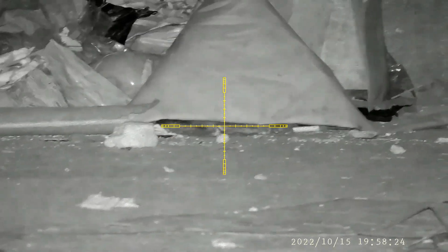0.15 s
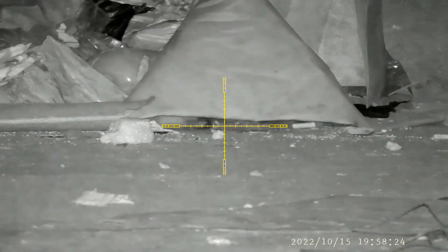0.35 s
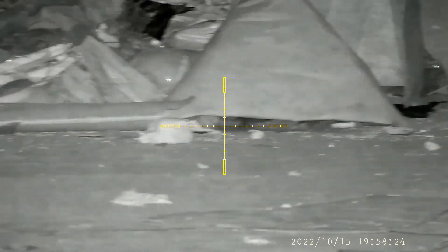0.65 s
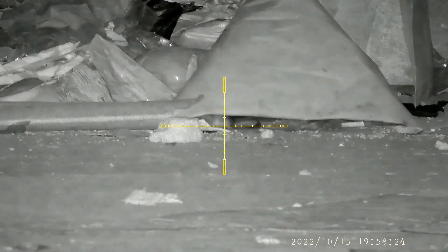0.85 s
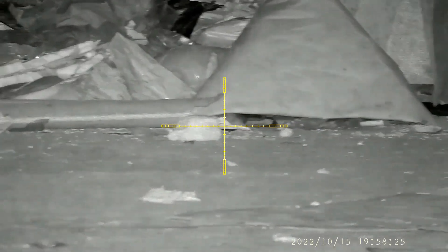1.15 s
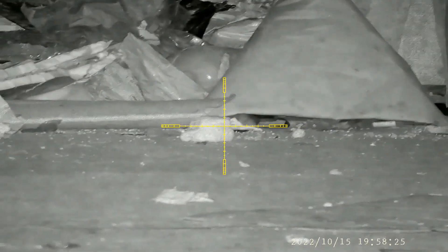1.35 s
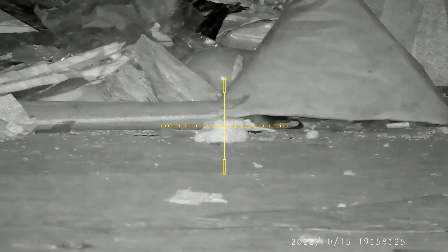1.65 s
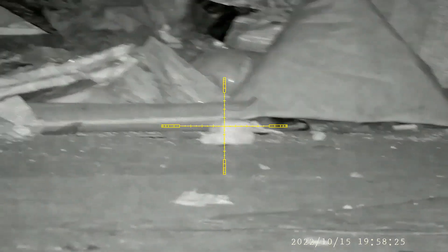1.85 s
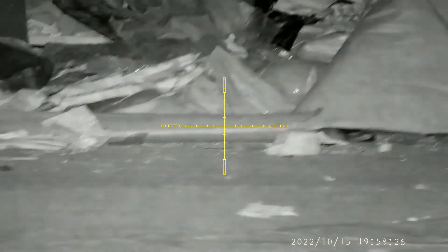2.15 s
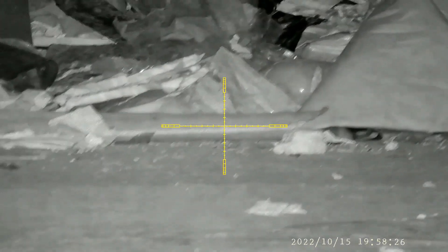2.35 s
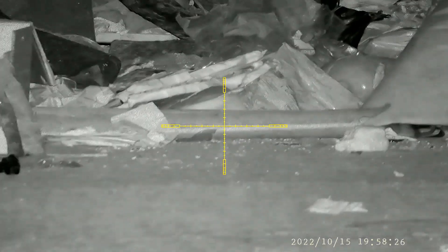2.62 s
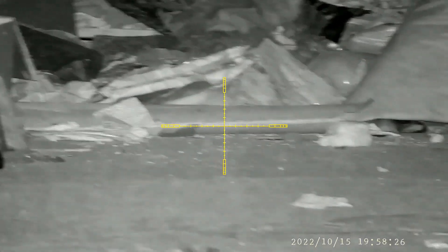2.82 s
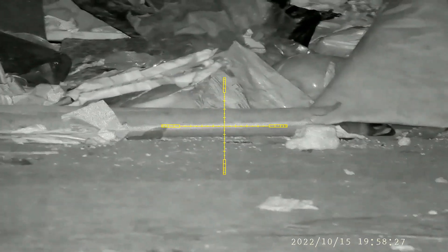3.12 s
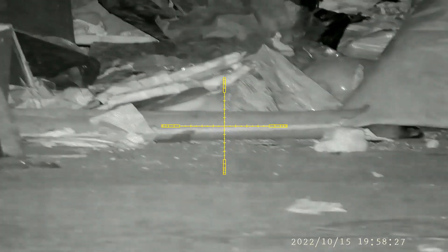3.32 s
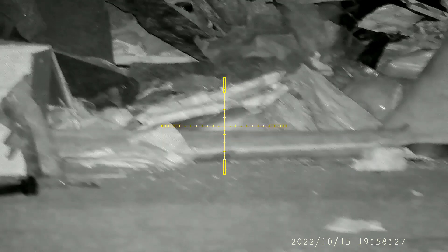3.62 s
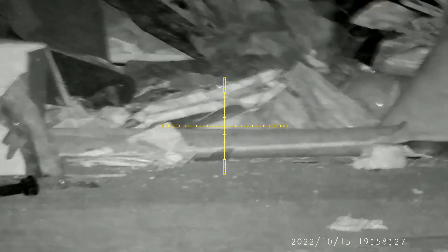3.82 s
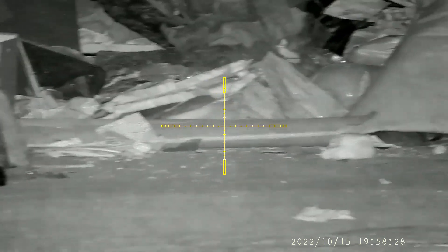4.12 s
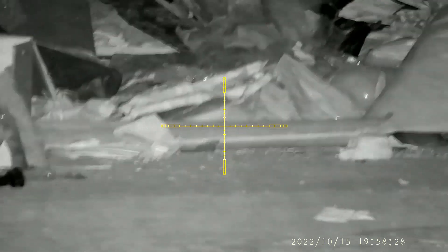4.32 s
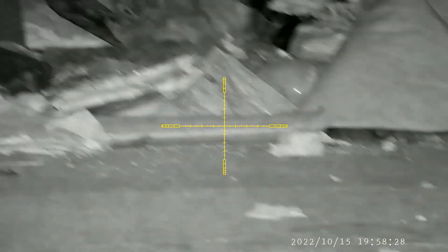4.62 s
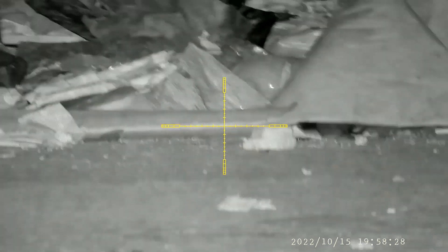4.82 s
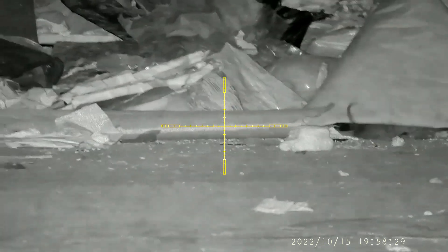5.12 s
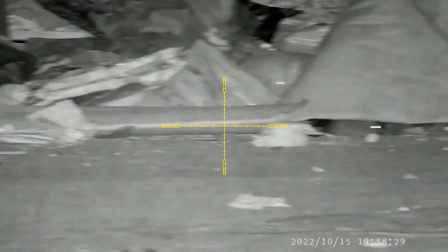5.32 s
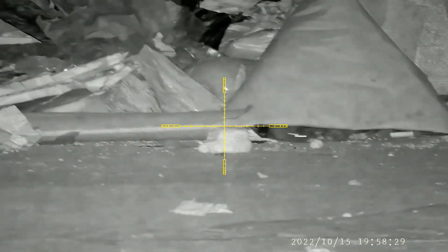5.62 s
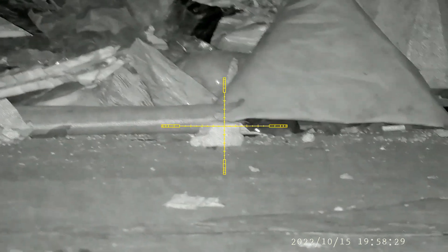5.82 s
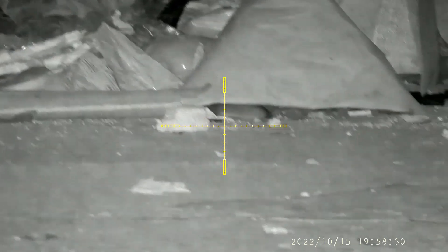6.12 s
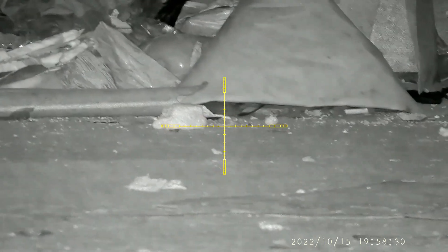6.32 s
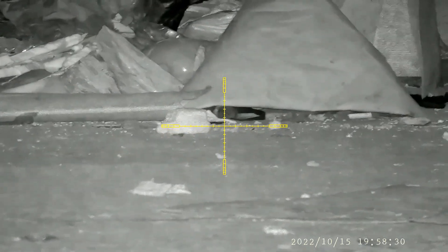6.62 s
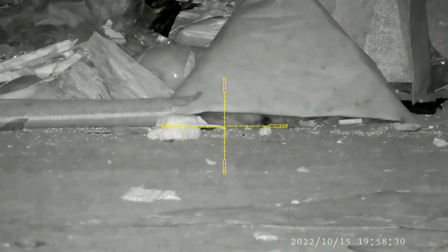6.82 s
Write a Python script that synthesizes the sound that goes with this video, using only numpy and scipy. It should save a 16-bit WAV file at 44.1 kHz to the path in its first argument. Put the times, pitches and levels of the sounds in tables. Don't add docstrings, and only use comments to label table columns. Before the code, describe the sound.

A microphone fixed to the rifle catches the shot as a clipped, dry crack, air burst and thump, followed by a fading steel ring and steady thin hiss. Small ticks lead to a dense run of cocking clanks and scrapes, then lighter knocks and a strong bolt-closing clack. Stock bumps thud the microphone. A distant cricket chirps sparsely; the last two seconds are mostly hiss.

```python
import sys
import numpy as np
from scipy import signal
from scipy.fft import rfft, irfft, next_fast_len
from scipy.io import wavfile
from scipy.ndimage import uniform_filter1d

SR = 44100
rng = np.random.default_rng(int(sys.argv[2]) if len(sys.argv) > 2 else 0)


def log_audio(samples):
    frames = np.atleast_2d(samples).T
    limited = np.clip(frames, -1, 1)
    pcm = np.round(limited * 32767).astype(np.int16)
    wavfile.write(sys.argv[1], SR, pcm)


def to_linear_factor(level_db):
    exponent = np.asarray(level_db, float) / 20
    return 10 ** exponent


N = 306803


def filtered(x, response):
    size = next_fast_len(N + SR // 2)
    spectrum = rfft(x, size) * response(np.fft.rfftfreq(size, 1 / SR))
    return irfft(spectrum, size)[..., :N]


def modes(hz, peaks):
    total = 0
    for k, (centre_hz, width_hz, level_db) in enumerate(peaks):
        damping = 1j * hz * width_hz
        total = total + (-1) ** k * to_linear_factor(level_db) * damping / (centre_hz ** 2 - hz * hz + damping)
    return total


def noise(response):
    x = filtered(rng.standard_normal(N), response)
    return x / np.std(x)


def add(track, start_s, sound):
    i = max(round(start_s * SR), 0)
    track[..., i:i + sound.shape[-1]] += sound[..., :N - i]


# pitch_hz, level_db
HISS = [(15, -27), (25, 2.5), (378, 0.5), (2770, -14.5), (6500, -20), (11200, -20.5), (15400, -28),
        (15900, -69.5)]
# pitch_hz, width_hz, level_db
SUPPLY = [(9500, 200, -70), (10440, 140, -72), (7100, 280, -78.5), (12600, 400, -85)]
# pitch_hz, level_db
WHINE = [(1265, -83), (9362, -81), (10363, -80.5)]
CLOCK_DB = [-80.5, -80, -77, -75, -78, -78, -73, -85, -80.5, -69.5, -93, -86.5, -84.5]


def electronics():
    pitch_hz, level_db = np.transpose(HISS)
    out = to_linear_factor(-61) * noise(lambda hz: to_linear_factor(np.interp(np.log(hz + 1), np.log(pitch_hz), level_db)))
    for centre_hz, width_hz, db in SUPPLY:
        out += to_linear_factor(db) * noise(lambda hz: np.exp(-((hz - centre_hz) / width_hz) ** 2))
    clock_hz = 1001
    tones = WHINE + [(clock_hz * (k + 1), db) for k, db in enumerate(CLOCK_DB)]
    for tone_hz, db in tones:
        wander = 0.0028 * np.cumsum(rng.standard_normal(N))
        out += to_linear_factor(db + 2.5) * np.sin(2 * np.pi * tone_hz * np.arange(N) / SR + wander)
    return out


# start_s, level_db, pulses
CHIRPS = [(2.531, -58, 2), (3.699, -58, 4), (4.862, -58, 4), (5.363, -60, 1), (6.069, -59, 4),
          (6.571, -59, 1)]


def cricket():
    out, t = np.zeros(N), np.arange(round(0.019 * SR)) / SR
    pulse = np.sin(np.pi * t / t[-1]) ** 0.23 * np.sin(2 * np.pi * 4066 * t)
    for start_s, level_db, pulses in CHIRPS:
        for k in range(round(pulses)):
            add(out, start_s + 0.022 * k, to_linear_factor(level_db + rng.normal(0, 1.0)) * pulse)
    return out


# top_s, top_db, swing_s, rebound_share
COCKING_JOLTS = [(.009, -15.5, 0.012, .47), (1.9198, -33, 0.00073, .9), (1.925, -23, .0033, 0.25),
                 (2.201, -25.5, .0095, 1.3), (2.221, -22, 0.0048, .78), (2.258, -21, .023, 0.43),
                 (2.276, -22.5, .019, .97), (2.303, -24.5, 0.0032, 1.05), (2.368, -25.5, 0.0041, 1.05),
                 (2.377, -16.5, .0098, .45), (2.391, -26, 0.0068, 1.1), (2.416, -17.5, .01, .2),
                 (2.573, -24, 0.035, 1.1), (2.684, -34, 0.0032, 0.4)]
CLOSING_JOLTS = [(3.236, -29, 0.019, 0.52), (3.25, -20.5, 0.019, 0.44), (3.263, -24.5, 0.01, 0.88),
                 (3.373, -33.5, 0.016, 0.56), (3.71, -32, 0.022, 0.67), (3.909, -15, 0.0032, 0.24),
                 (3.92, -22.5, 0.011, 0.67), (3.938, -31, 0.0063, 0.56), (4.051, -36, 0.022, 0.6),
                 (4.376, -20.5, 0.0031, 1.1), (4.384, -23, 0.0067, 1.6), (4.414, -28, 0.0091, 1.2),
                 (4.425, -20, 0.0051, 1.2), (4.447, -32, 0.0041, 0.8), (4.5213, -20.5, 0.042, 0.23),
                 (4.616, -27, 0.027, 0.49), (4.68, -32.5, 0.056, 1.43), (4.89, -24.5, 0.026, 0.86)]
SWAYS = [(0.022, -20, 0.003, 1.3), (0.042, -22, .0048, 0.58), (0.074, -25.5, 0.039, 0.43),
         (0.098, -31, 0.02, 0.42), (.12, -36, 0.022, 1.2), (0.148, -32, 0.017, 0.47),
         (.173, -26.5, 0.02, 0.26), (0.195, -32, 0.0087, 0.12), (4.393, -11.5, 0.0087, 0.29),
         (4.437, -29, 0.0037, .14), (4.454, -24.5, 0.0041, 0.49), (4.487, -17, 0.046, 0.5),
         (4.54, -32.5, 0.022, 0.72), (4.593, -28.5, 0.032, 1.4)]


def lurches():
    out = np.zeros(N)
    jolt_fall_s, sway_fall_s = 0.0021, 0.013
    rows = [(*row, jolt_fall_s) for row in COCKING_JOLTS + CLOSING_JOLTS]
    rows += [(*row, sway_fall_s) for row in SWAYS]
    for top_s, top_db, swing_s, rebound, fall_s in rows:
        swing, fall = max(swing_s, .001) * SR, max(fall_s, .001) * SR
        u, v = np.arange(swing) / swing, np.arange(fall) / fall
        rise = -u ** .8 * np.sin(1.5 * np.pi * u)
        drop = 1 - (1 + rebound) * (1 - np.cos(np.pi * v)) / 2
        settle_s = 0.0055 + 0.67 * fall_s
        settle = -rebound * np.exp(-(np.arange(SR // 10) / SR / settle_s) ** 1.5)
        add(out, top_s - len(u) / SR, to_linear_factor(top_db) * np.concatenate([rise, drop, settle]))

    def capsule(hz):
        mount = 1 + modes(hz, [(129, 12, -14.0), (269.8, 22, -9.0)])
        return mount / (1 + 1j * hz / 900) * hz / (hz - 6j)

    return filtered(out, capsule)


# pitch_hz, width_hz, level_db
HOUSING = [(1445, 93, -1), (1978, 110, 4.5), (2680, 38, -13), (3030, 140, -3.5), (3544, 150, -9),
           (4160, 170, -3), (5180, 120, -14.5), (5330, 110, -21.5), (6294, 200, -3.5), (8396, 200, -21.5),
           (9500, 540, -46.5), (11300, 90, -38), (11725, 250, -36.5), (13200, 260, -31.5)]
# low_hz, high_hz
EDGES = [(300, 650), (800, 1250), (1250, 1700), (1700, 2350), (2350, 3250), (3250, 3800), (3800, 5000),
         (5000, 5800), (5800, 6900), (6900, 8500), (9000, 11500), (11500, 13400)]


def housing():
    hz = np.fft.rfftfreq(SR // 2, 1 / SR)
    broad = [(417, 130, -17.5), (1103, 320, -7.5), (2430, 940, -10.0), (6500, 3300, -16.5), (10500, 1800, -41)]
    whole = irfft(modes(hz, HOUSING) + modes(hz, broad))[:SR // 25]
    groups = []
    for band in EDGES:
        sos = signal.butter(2, band, "band", fs=SR, output="sos")
        groups.append(signal.sosfilt(sos, whole))
    return np.array(groups) / np.linalg.norm(groups, axis=1)[:, None]


# start_s, end_s, first_db, last_db, brightness_db
SLIDES = [(1.927, 1.978, -52, -65, 1.5), (2.173, 2.216, -47.5, -48.5, -5.5),
          (2.228, 2.31, -54, -37.5, -6.5), (2.292, 2.338, -40.5, -36, -4.5), (2.342, 2.422, -40, -37, -3),
          (2.405, 2.506, -47, -63, -0.5), (2.472, 2.538, -64, -55, -1), (2.584, 2.734, -48.5, -58.5, -5),
          (3.194, 3.34, -54.5, -53, 2), (3.683, 3.81, -56, -63.5, -2), (3.92, 3.978, -50, -59.5, -1),
          (3.982, 4.246, -58, -66.5, -6), (4.373, 4.447, -44, -50.5, -3.5), (4.446, 4.562, -54, -51.5, 0.5),
          (4.552, 4.66, -54.5, -54.5, -2), (4.66, 4.755, -55, -62, -2.5), (4.884, 4.936, -58, -56.5, -2.5),
          (4.924, 4.973, -57, -50.5, -10), (4.972, 5.059, -64, -70, -4.5)]


def scrape():
    t, level = np.arange(N) / SR, np.zeros((2, N))
    for start_s, end_s, first_db, last_db, bright_db in SLIDES:
        ramp_db = np.interp(t, [start_s, end_s], [first_db, last_db], left=-120, right=-120)
        level += to_linear_factor(ramp_db + [[0], [bright_db]])
    level = uniform_filter1d(level, size=500)

    def lumps(size, rows):
        return rng.standard_normal((rows, N // size + 1)).repeat(size, axis=1)[:, :N]

    clumping_db = 1.7 * lumps(60, 1) + 3.1 * lumps(400, len(EDGES))
    grains = rng.standard_normal((len(EDGES), N)) * to_linear_factor(clumping_db)
    colour_db = np.array([-8.5, -8.0, -8, -5.5, -12, -10.5, -8.5, -12, -9, -9.5, -11.5, -14.5])[:, None]
    drive = grains / np.std(grains) * level[[0] * 5 + [1] * 7] * to_linear_factor(colour_db)
    return signal.oaconvolve(drive, housing()[:, :SR // 50], axes=1)[:, :N].sum(axis=0)


# pitch_hz, level_db
COIL = [(1400, -9), (2010, 3), (2300, -0.5), (2920, -4), (4080, -8), (4260, -14), (5330, -5), (5560, -11),
        (6050, -1), (7000, -9), (8050, -0.5), (8380, -1)]
# time_s, level_db
COIL_SWELL = [
    (2.525, -78),
    (2.534, -53),
    (2.546, -48),
    (2.549, -35.5),
    (2.556, -46),
    (2.559, -75),
]


def coil():
    time_s, level_db = np.transpose(COIL_SWELL)
    t, out = np.arange(time_s[0], time_s[-1], 1 / SR), np.zeros(N)
    creak = np.zeros(len(t))
    for pitch_hz, db in COIL:
        wander = 0.031 * np.cumsum(rng.standard_normal(len(t)))
        creak += to_linear_factor(db) * np.sin(2 * np.pi * pitch_hz * t + wander)
    add(out, time_s[0], to_linear_factor(np.interp(t, time_s, level_db)) * creak)
    return out


def ringing(bar, level_db, rough):
    t = np.arange(SR * 2 // 3) / SR
    out = np.zeros(len(t))
    for pitch_hz, db, t60_s in bar:
        wander = rough * np.cumsum(rng.standard_normal(len(t)))
        out += to_linear_factor(level_db + db - 60 * t / min(t60_s, .8)) * np.sin(2 * np.pi * pitch_hz * t + wander)
    return out


# pitch_hz, level_db, rise_s, t60_s
TANK = (1841, -27, 0.37, 1.02)
# pitch_hz, level_db, t60_s
BARREL = [(2310, -28, .29), (2697, -20, 0.3), (4592, -28, 0.38), (3564, 7, 0.23), (5125, -7, 0.31),
          (6282, -12, .45), (8479, -25, .5), (9577, -17, 0.43), (1200, -22, 0.55), (440, -21.5, .3),
          (320, -23, .8), (197, -27, 0.7), (10400, -30, .3), (11700, -27, .2)]
CATCH = [(1529, -6, 0.09), (2202, -7, 0.15), (2573, 2, 0.07), (6438, -7, .095), (2950, -8, 0.12),
         (3542, -7, 0.25), (5647, -8, 0.13), (6282, -7, .1), (8662, -11, 0.17), (9335, -7, 0.08),
         (9787, -12, .16), (15300, -25, .1), (13440, -11, .09)]
BREECH = [(1480, -7, 0.16), (1992, -12, .25), (3558, 0, 0.22), (3811, -8, .22), (4194, -8, 0.35),
          (6277, -6, 0.27), (6977, -13, .13), (9770, -14.5, 0.081)]
LEVER = [(1437, 5, 0.08), (3558, -3, 0.25), (4544, -9, 0.11), (5216, 1, 0.14), (5642, -13.5, 0.13),
         (6282, -24, 0.3), (1900, -20, 0.4), (9006, -20.5, 0.25)]


def steel():
    out, t = np.zeros(N), np.arange(2 * SR) / SR
    pitch_hz, level_db, rise_s, t60_s = TANK
    swell = to_linear_factor(level_db - 60 * t / t60_s) * (1 - np.exp(-(t / rise_s) ** 2))
    add(out, 0, swell * np.sin(2 * np.pi * pitch_hz * t))
    add(out, 0, ringing(BARREL, -24.0, rough=.003))
    add(out, 2.215, ringing(CATCH, -36.0, rough=.006))
    add(out, 2.372, ringing(BREECH, -39.5, rough=.005))
    add(out, 2.412, ringing(LEVER, -32.5, rough=0.0066))
    add(out, 4.385, ringing(BREECH, -38.5, rough=0.0058))
    return out


# time_s, level_db
AIR = [
    (0, -24.5),
    (.042, -28.5),
    (0.065, -38.5),
    (0.073, -44),
    (0.083, -62),
    (.12, -76.5),
]


def air():
    level = to_linear_factor(np.interp(np.arange(N) / SR, *np.transpose(AIR), right=-120))
    peaks = [(2200, 6000, -3.5), (5923, 4100, -1.0), (10800, 4900, -2.5)]
    return level * noise(lambda hz: modes(hz, peaks) * (hz > 900))


# (0 gives the ten lower groups the
# common EVEN_DB colour, 1 the part's own colour; the two treble groups always take the part's treble_db)
HAMMER = [(0, 5, 1.5, 0.66), (.002, 0.5, 1.56, 1.3), (.006, -1, 1.5, 0.73), (.008, -9, 4, 2.7),
          (.0143, 1, .8, 0.63), (.016, -3.5, 1.4, 1.7), (.0198, -12, 1.5, .6), (.024, -12.5, 5.7, 1.2),
          (.0298, -5, 1.2, 0.9), (.0315, -10, 1.5, 0.85), (.033, -16.5, 2.4, 0.53), (.039, -13, 1.4, 0.68),
          (.042, -26, 9.2, .1)]
BOLT = [(2.179, -11, 1.9, 1.36), (2.189, -18.5, 2.8, 0.31), (2.366, 1.5, 1.46, 0.38),
        (2.369, -2, 3.3, 2.85), (2.373, -4.5, 0.55, 1), (2.381, -20, 10.3, 1.4), (3.24, -15.5, 1.6, 0.68),
        (4.378, -1, 1.52, 1.23), (4.382, -2.5, 2.2, 0.82), (4.432, -37, 2.5, 1.1)]
SEAR = [(.0035, -5, 1.65, 1.2), (2.2043, 1, 1.6, 0.27), (2.298, -26, 2.2, 0.64), (2.357, -9, 3.3, 1.1),
        (2.401, -20, 1.4, 1.3), (2.405, -3, 2.7, 0.32), (3.209, -49.5, 3, 0.33), (4.368, -8.5, 1.27, 0.34),
        (4.375, -4.5, 3.1, 1.23), (4.548, -14, 2.06, 1.04)]
PIVOT = [(2.2075, -7.5, 2.2, 0.69), (2.21, -11, 1.8, 1), (2.314, -16.5, 3.6, 0.63), (2.325, -21, 1.3, 0.36),
         (2.362, -14, 4.25, 0.32), (3.225, -34, 2.7, 0.49), (3.227, -22, 1.8, 0.54),
         (3.2295, -23.5, 1.6, .6), (3.2375, -14, 1.4, 0.36), (3.243, -31, 2.6, 0.32),
         (3.2615, -12, 2, 1.15), (3.898, -22, 1.84, 0.82), (3.9005, -16, 1.5, 1.2), (3.903, -18, 1.7, 0.69)]
STOP = [(2.307, -16.5, 4.2, 0.39), (2.681, -25.5, 2.7, 1), (3.318, -25.5, 0.54, 0.28), (3.908, -16, 2.9, 1),
        (4.386, -23, 2.7, 0.2)]
LOCK = [(2.408, 0.5, 1.7, 1.1), (2.4125, -11.5, 2, 1)]
SAFETY = [(1.749, -31, 0.33, 0.94), (4.426, -34.5, 1.5, 1)]
SLING = [(1.9195, -17.5, 0.72, 1), (1.924, -29, 1.3, 0.68)]
CAP = [(2.2095, -26, 2.6, 1), (2.2125, -22.5, 1.5, 1), (3.266, -35, 2, 1), (3.272, -41, 12, 0.92),
       (4.385, -25.5, 1.17, 1), (4.39, -39, 12, 1), (4.405, -43.5, 12, 1), (4.432, -50, 3, 1)]
RAIL = [(.475, -46, 7.8, 1.3), (.496, -35, 1.7, 0.2), (.543, -61, 2.7, 1.46), (.651, -29.5, 1.34, 0.91),
        (2.548, -35, 1.3, 0.47)]
STOCK = [(.007, -13.5, 2.75, 1.03), (2.3026, 2.5, 1, 0.7), (2.5668, -7.5, 1.5, 2), (2.564, -8.5, 3.9, 1.04),
         (2.601, -26, 3.2, 1.2), (2.6045, -23.5, 1.6, 1.17), (3.249, -21.5, 7.1, 0.6),
         (3.267, -16.5, 1.1, 0.78), (3.279, -31.5, 3.9, 0.91), (3.912, -26, 5.3, 0.89),
         (4.413, -31, 1.5, 1.05), (2.641, -36.5, 1.45, 1.1), (3.692, -40, 1.58, .6), (4.521, -36, 1.2, 1.5)]
MORE_SEAR = [(2.1788, -17, 1, 1.1)]
# start_s, energy_db
TICKS = [(0.489, -43), (.645, -28.5), (3.567, -42.5), (4.638, -51), (4.93, -23), (4.943, -49.5),
         (4.95, -39), (4.96, -38.5)]
TICK_MS, TICK_FOCUS = 6.9, 0.87
# contacts, lower_colour_db (ten lower mode groups), treble_db (two upper groups)
PARTS = [(HAMMER, (-28.5, -23, -15, -11.5, -22.5, -7.5, -0.5, -17.5, -6.5, -14.5), (-9.5, -13)),
         (BOLT, (-26, -21.5, -13, -15.5, -14, -4.5, 0, -13, -8, -9), (-26, -32)),
         (SEAR, (-26.5, -17.5, -14.5, -9.5, -12, -14, -9.5, -15.5, -1, -6), (-25, -35)),
         (PIVOT, (-22, -20.5, -6.5, 0.5, -13, -15.5, -8, -14, -4.5, -12), (-20, -29.5)),
         (STOP, (-18.5, -7, -7, -2.5, -12.5, -13.5, -3, -22, -15.5, -19), (-22, -17)),
         (LOCK, (-22, -10.5, -6, -7.5, -11, -4, -9.5, -10.5, -14, -16), (-24.5, -36)),
         (SAFETY, (-8, -18.5, 1, -7.5, -22, -7.5, -5.5, -33.5, -15, -34), (-31, -43.5)),
         (SLING, (-14, -7, -7.5, -3.5, -16, -9, -1, -9.5, 1, -23), (-28, -15)),
         (CAP, (-27, -25.5, -21.5, -15, -18.5, -10.5, -12, -15, -12.5, -7.5), (0, -2)),
         (RAIL, (-19, -6.5, -17.5, -9.5, -19.5, -31, 4, -4, -16.5, -26.5), (-30, -35.5)),
         (STOCK + [(s, db, TICK_MS, TICK_FOCUS) for s, db in TICKS],
         (-24.5, -20, -12.5, -2, -13, -15, -8.5, -23, -18, -21.5), (-26, -36.5)),
         (MORE_SEAR, (-30.5, -24.5, -20, -13.5, -14, -16, -10, -8, 0, -10), (-25, -35))]
EVEN_DB = (-20, -13, -9, -1.5, -6.5, -9, -2.5, -8, -2.5, -7)


def contacts():
    t, out, body = np.arange(SR // 25) / SR, np.zeros(N), housing()
    briefer = np.array([0.55, 0.45, 1.9, 1.2, 1.7, 0.96, 1.3, 0.74, 0.71, 1.3, 0.75, 1.6])[:, None]
    for rows, colour_db, treble_db in PARTS:
        for start_s, energy_db, rattle_ms, focus in rows:
            lower_db = np.add(EVEN_DB, focus * np.subtract(colour_db, EVEN_DB))
            length_s = max(rattle_ms / 1000, .0004)
            trail = to_linear_factor(-32.0 - 60 * t / 0.043)
            shape = np.exp(-(t / (length_s * briefer)) ** 2) + trail
            onset = 1 - np.exp(-t / (0.00014 + 0.15 * length_s))
            rattle = rng.standard_normal((len(EDGES), len(t))) * onset * shape
            rattle[:, 0] = to_linear_factor(-3 - .4 * np.arange(len(EDGES))) * np.sqrt(length_s * SR)
            ring = signal.fftconvolve(rattle, body, axes=1)
            ring /= np.linalg.norm(ring, axis=1)[:, None]
            add(out, start_s, to_linear_factor(energy_db + np.append(lower_db, treble_db) + 16.5) @ ring)
    return out


# time_s, gain_db
GAIN = [
    (0, -23.5),
    (0.088, -7),
    (.16, 3.5),
    (0.229, 9),
    (.5, 3.5),
    (1.2, 2.5),
    (7, 1.5),
]


def scene():
    gain = to_linear_factor(np.interp(np.arange(N) / SR, *np.transpose(GAIN)))
    blows = contacts() + air() + coil() + scrape() + lurches()
    return (blows + gain * (steel() + cricket() + electronics()))[None]


def during(spans, t):
    return np.any([(t >= start_s) & (t <= end_s) for start_s, end_s in spans], axis=0)


def holes(hz, t, share):
    field = rng.standard_normal((len(hz), len(t)))
    field = uniform_filter1d(uniform_filter1d(field, size=3, axis=0), size=24, axis=1)
    return (field < np.quantile(field, share)) * (hz > 11000)[:, None]


# start_s, end_s
DROPS = [(.483, .514), (.643, .676), (1.73, 1.763), (1.891, 1.919), (2.147, 2.203), (2.277, 2.295),
         (2.306, 2.367), (2.372, 2.385), (2.4, 2.407), (2.41, 2.418), (2.531, 2.594), (2.66, 2.689),
         (3.202, 3.2655), (3.874, 3.905), (4.354, 4.378), (4.381, 4.384), (4.546, 4.577)]
# start_s, end_s
LEAKS = [(2.203, 2.209), (2.295, 2.306), (2.367, 2.372), (2.407, 2.41), (4.378, 4.381)]
THIN = [.157, .239, .712, .775, 1.16, 1.223, 1.347, 1.456, 2.228, 2.241, 2.252, 2.482, 2.546, 2.737, 2.824,
        2.864, 2.888, 3.144, 3.525, 3.955, 4.018, 4.145, 4.167, 4.232, 4.453, 4.465, 4.845, 4.855, 4.934,
        5.085, 5.491, 6.473, 6.619, 6.812, 6.855]
STARVED = [2.737, 4.165, 4.851, 4.934, 5.085, 1.347]


def dropouts(x):
    now = np.arange(N) / SR
    treble = filtered(x, lambda hz: .988 * np.clip((hz - 8600) / 250, 0, 1))
    lost = np.maximum(during(DROPS, now), 0.64 * during(LEAKS, now))
    x = x - treble * uniform_filter1d(lost, size=160)
    hz, t, z = signal.stft(x, SR, nperseg=512, noverlap=384)

    def frames(centres_s):
        half_s = .013 / 2
        return during([(s - half_s, s + half_s) for s in centres_s], t) * (hz > 450)[:, None]

    steady = uniform_filter1d(np.abs(z), size=15, axis=1)
    neighbours = uniform_filter1d(steady, size=13, axis=0)
    thin = (np.abs(z) < to_linear_factor(2) * steady) * frames(THIN) * ~frames(STARVED)
    bare = (steady < to_linear_factor(0.9) * neighbours) * frames(STARVED)
    z = z * (1 - .9 * thin) * (1 - .9 * bare) * (1 - .75 * holes(hz, t, share=.12))
    return signal.istft(z, SR, nperseg=512, noverlap=384)[1][:, :N]


def low_pass(x):
    return signal.sosfilt(signal.butter(12, 15880, fs=SR, output="sos"), x)


def record(dry):
    top = np.where(np.arange(N) < 0.5 * SR, .76, .98)
    clipped = dry / (1 + np.abs(dry / top) ** 6) ** (1 / 6)
    mix = dropouts(clipped)
    return low_pass(mix)


dry = scene()
out = record(dry)
log_audio(out)
```